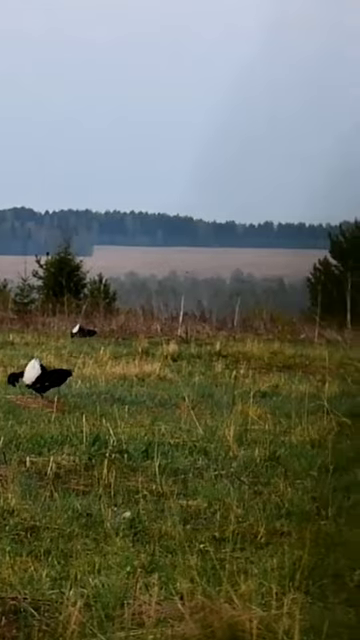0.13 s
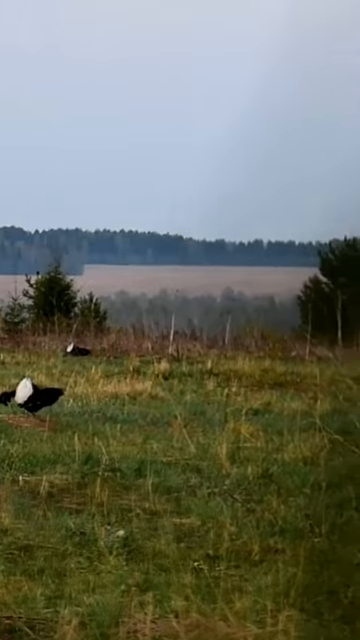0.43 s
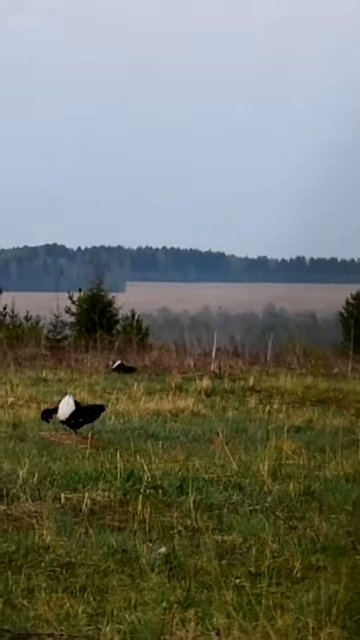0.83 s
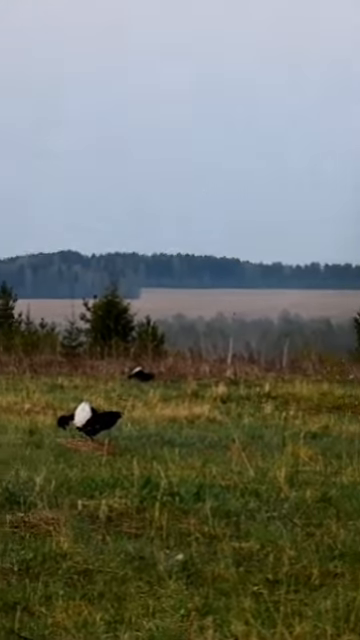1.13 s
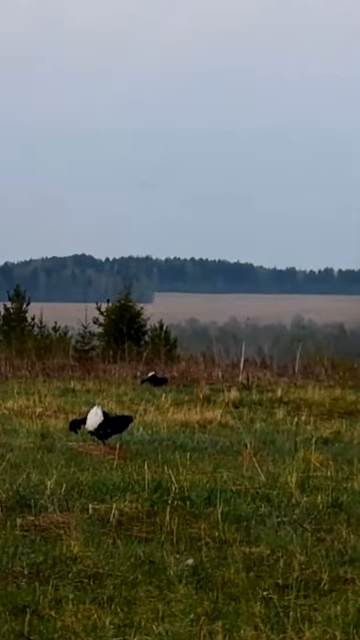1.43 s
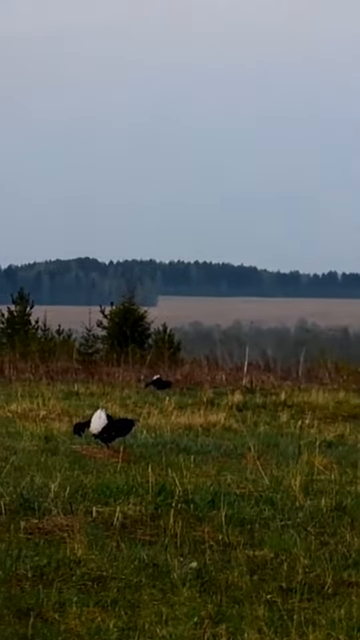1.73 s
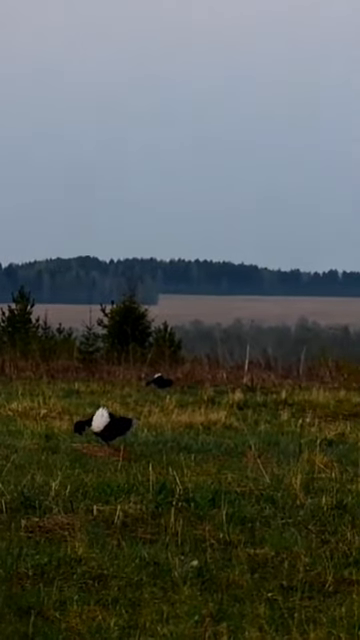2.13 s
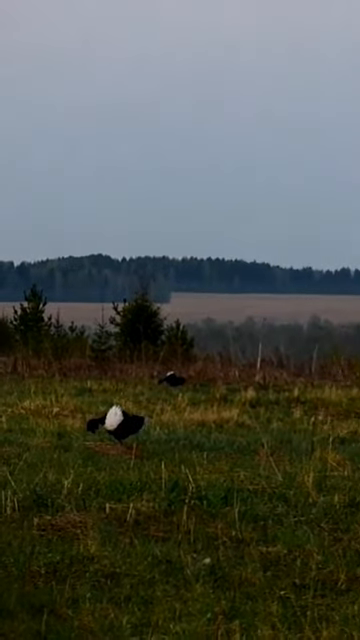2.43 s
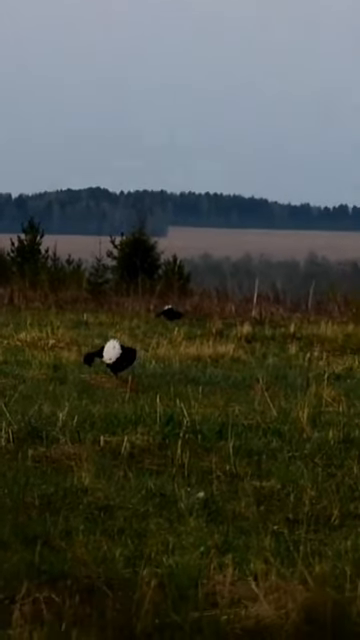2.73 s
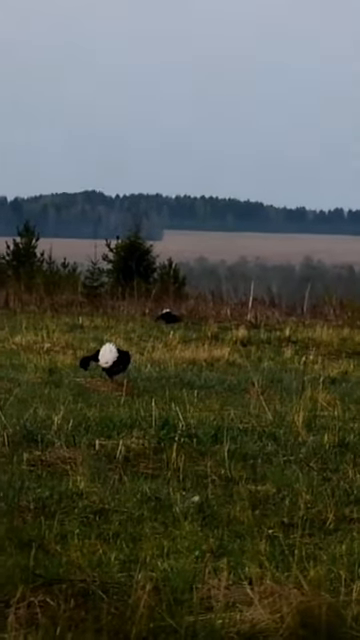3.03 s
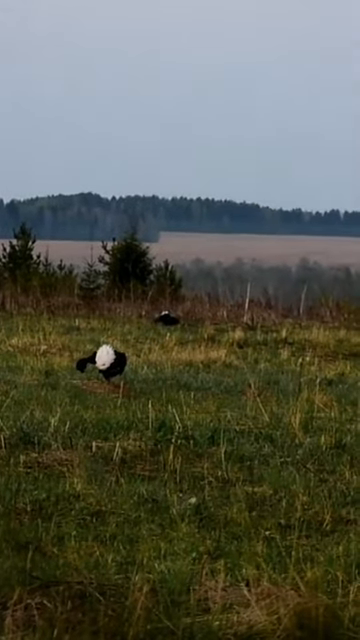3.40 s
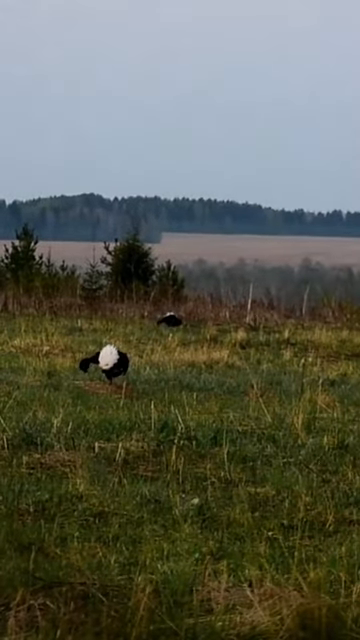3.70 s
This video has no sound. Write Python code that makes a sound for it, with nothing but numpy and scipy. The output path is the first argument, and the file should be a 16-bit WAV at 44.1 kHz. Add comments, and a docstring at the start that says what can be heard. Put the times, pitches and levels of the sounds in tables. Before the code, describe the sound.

Bubbling grouse coos and a long hoarse hiss in a field, with light rustling and chirps.

```python
"""An open field where black grouse display, under a faint hush of moving air.
Close by, fabric rustles by stick-slip friction and ticks as its folds snap over. Resonating air sacs
give a bubbling run of soft, falling coos, while small songbirds whistle arched, frequency-modulated
notes overhead; ground and trees scatter both into echoes. Last comes one cock's long, hoarse hiss:
turbulent air filtered by the resonance of his throat."""
import sys
import numpy as np
from scipy import signal
from scipy.fft import rfft, irfft
from scipy.io import wavfile
from scipy.ndimage import uniform_filter1d

SR = 44100
rng = np.random.default_rng(int(sys.argv[2]) if len(sys.argv) > 2 else 0)


def log_audio(samples):
    """Write samples as a 16-bit WAV file to the path given in sys.argv[1]."""
    # one column per channel
    frames = np.atleast_2d(samples).T
    # limit to full scale, then quantise
    limited = np.clip(frames, -1, 1)
    pcm = np.round(limited * 32767).astype(np.int16)
    wavfile.write(sys.argv[1], SR, pcm)


N = 170226
T = np.arange(N) / SR


def from_db(db):
    """Amplitude ratio of a level in dB."""
    return 10 ** (np.asarray(db) / 20)


def unit_rms(x):
    """Normalisation to an rms of 1."""
    return x / np.sqrt(np.mean(x ** 2) + 1e-20)


def in_time(rows):
    """Linear interpolation of each column over the times in the first."""
    s, *columns = np.transpose(rows)
    return [np.interp(T, s, c) for c in columns]


def add(out, start_s, sound):
    """Superposition of a sound from its starting time."""
    i = int(np.clip(start_s * SR, 0, N))
    out[i:i + len(sound)] += sound[:N - i]


def coloured(x, spectrum):
    """Filtering by a spectral envelope; rms 1."""
    hz, db = np.transpose(spectrum)
    bins = np.maximum(np.fft.rfftfreq(N, 1 / SR), 1)
    gain = from_db(np.interp(np.log(bins), np.log(hz), db))
    return unit_rms(irfft(rfft(x) * gain, N))


def drift(corner_hz):
    """Random fluctuation: low-passed Gaussian noise of rms 1."""
    r = np.exp(-2 * np.pi * corner_hz / SR)
    return unit_rms(signal.lfilter([1], [1, -2 * r, r * r], rng.standard_normal(N + SR))[SR:])


# spectrum of open air: f/Hz, relative level/dB
AIR_SPECTRUM = [(25, -14), (70, -4), (350, 1.5), (800, -5.5), (2000, -6), (3700, -4), (5500, -13),
                (16000, -25.5)]
def open_air(level_db=-58.5):
    """Stationary broadband noise: the hush of open air."""
    return from_db(level_db) * coloured(rng.standard_normal(N), AIR_SPECTRUM)


# spectrum of the fabric: f/Hz, relative level/dB
FABRIC_SPECTRUM = [(60, -16.5), (2300, -9), (3300, 2.5), (5200, -6.5), (6200, -10), (7700, -16),
                   (10200, -14), (11500, -21), (16000, -32)]
# envelope of the rubbing: t/s, level/dB
RUB_ENVELOPE = [(.13, -62.5), (.22, -53), (.4, -58), (.6, -56), (.88, -55), (1.06, -57), (1.3, -54),
                (1.55, -51), (1.8, -47.5), (1.98, -63), (2.92, -56.5), (3.05, -61), (3.74, -59),
                (3.82, -53.5)]
def fabric_rustle(slips_per_s=1500, spread_db=3, decay_s=0.0007, flutter_db=1.67):
    """Stick-slip friction: fibres catch and let go, each slip a tiny decaying burst of noise."""
    db, = in_time(RUB_ENVELOPE)
    sizes = from_db(spread_db * np.minimum(rng.exponential(1, N), 5))
    slips = sizes * (rng.random(N) < slips_per_s / SR)
    power = signal.lfilter([1], [1, -np.exp(-1 / (decay_s * SR))], slips ** 2 + 1e-18)
    crackle = coloured(np.sqrt(power) * rng.standard_normal(N), FABRIC_SPECTRUM)
    return crackle * from_db(db + flutter_db * drift(38))


# snapping folds: t/s, relative level/dB, resonance f/Hz
FOLD_SNAPS = [(0.1622, -45, 2360), (.185, -41, 3180), (.2043, -38.5, 3330), (0.255, -52.5, 10200),
              (.302, -52.5, 12800), (0.8513, -40, 6140), (0.9, -48, 9500), (0.976, -36.5, 3240),
              (1.141, -39.5, 3370), (1.3803, -41, 3320), (1.488, -45.5, 5600), (1.53, -42, 3240),
              (1.636, -44.5, 4600), (1.733, -40, 7200), (1.739, -37, 9700), (1.93, -34, 4380),
              (2.074, -46.5, 4000), (2.1485, -43, 3600), (2.273, -47, 3900), (2.4106, -51, 9300),
              (2.6207, -42.5, 10600), (2.696, -38, 3500), (2.827, -46.5, 3280), (2.8578, -41.5, 2800)]
def fabric_ticks(tick_s=0.0056, bandwidth_hz=1320, crack_db=-4):
    """Buckling: a fold snaps over in a few milliseconds of crackle with a resonance of its own."""
    out = np.zeros(N)
    crack = from_db(crack_db) * coloured(rng.standard_normal(N), FABRIC_SPECTRUM)
    t = T[:SR // 20]
    envelope = t * np.exp(-3.5 * t / tick_s)
    r = np.exp(-np.pi * bandwidth_hz / SR)
    for s, db, hz in FOLD_SNAPS:
        resonator = [1, 0, -1, 1, -2 * r * np.cos(2 * np.pi * hz / SR), r * r]
        ring = unit_rms(signal.sosfilt([resonator] * 2, rng.standard_normal(len(t))))
        snap = (ring + crack[int(s * SR):][:len(t)]) * envelope
        snap_rms = np.sqrt(np.sum(snap ** 2) / (tick_s * SR))
        add(out, s, from_db(db) * snap / snap_rms)
    return out


def coo(hz, half_s, sweep_hz, arch_hz=56, overtone_db=-24):
    """Air-sac resonance: a near-pure note swells and fades, arching from hz + sweep to hz - sweep."""
    u = np.arange(-half_s, half_s, 1 / SR) / half_s
    pitch = hz - sweep_hz * u - arch_hz * u ** 2
    phase = 2 * np.pi * (np.cumsum(pitch) / SR + rng.random())
    swell = np.cos(np.pi / 2 * u).clip(0) ** 2.64
    return swell * (np.sin(phase) + from_db(overtone_db) * np.sin(2 * phase))


def echoes(x, span_s=0.22, count=40):
    """Scattering from ground and trees: delayed, dying copies, together as strong as the source."""
    out = np.zeros(N)
    for lag, size in zip(rng.random(count), rng.standard_normal(count)):
        add(out, lag * span_s, x * size * from_db(-20 * lag))
    return unit_rms(out) * np.std(x)


# even runs of coos: first note, last note, count; each note: centre t/s, level/dB, f/Hz
COO_RUNS = [((.208, -48.5, 396), (.724, -46, 408), 8), ((1.02, -50, 392), (1.822, -43, 430), 12)]
# single coos: centre t/s, level/dB, f/Hz, half duration/s
SINGLE_COOS = [(1.1, -52.5, 509.4, .07), (1.258, -49, 558, 0.031), (1.901, -45, 435.4, .045),
               (1.983, -40.5, 437, .025), (2.048, -44, 464, .025), (2.111, -48.5, 433, 0.016),
               (2.388, -41.5, 501.6, 0.033), (2.485, -41, 486, 0.011), (2.566, -43, 457, 0.015),
               (2.614, -40.5, 467, 0.016), (2.654, -41.5, 410, 0.023), (2.692, -40, 432, 0.013),
               (2.73, -40.5, 419, 0.017), (2.768, -44, 391, 0.018), (2.868, -39.5, 439, .032),
               (3.0, -43, 494.7, 0.056), (3.086, -42.5, 440, 0.0133), (3.157, -40, 534, 0.014),
               (3.23, -43.5, 542.6, 0.04), (3.269, -42.5, 470, .026), (3.307, -42.5, 431, 0.015),
               (3.343, -42.5, 428, 0.016), (3.412, -38.5, 446, 0.022), (3.815, -49, 518, 0.048)]
def grouse_bubbling(half_s=0.033, steep_hz=91.2, shallow_hz=47.3, far_hz=479.7, far_count=110):
    """Superposition of coos: steeply falling runs, flatter single notes and a far, scattered murmur."""
    near, far = np.zeros(N), np.zeros(N)
    for first, last, count in COO_RUNS:
        for s, db, hz in np.linspace(first, last, count):
            add(near, s - half_s, from_db(db) * coo(hz, half_s, steep_hz))
    for s, db, hz, own_half_s in SINGLE_COOS:
        add(near, s - own_half_s, from_db(db) * coo(hz, own_half_s, shallow_hz))
    for s, detune in zip(rng.uniform(0, T[-1], far_count), rng.standard_normal(far_count)):
        add(far, s, from_db(-59.5) * coo(far_hz * np.exp(0.0943 * detune), half_s, shallow_hz))
    return near + from_db(-11) * echoes(near) + echoes(far)


def whistle(length_s, pitches, rasp=0.48, rasp_hz=1286, waver_depth=0.0142):
    """Modulation: a tone arches through three pitches; rasp shakes its amplitude and phase at random."""
    u = np.linspace(0, 1, int(length_s * SR))
    hz = np.polyval(np.polyfit([0, .5, 1], pitches, 2), u)
    waver = np.interp(u, np.linspace(0, 1, 20), rng.standard_normal(20))
    knots = rng.standard_normal(400) + 1j * rng.standard_normal(400)
    shake = np.interp(u * length_s * rasp_hz, np.arange(len(knots)), knots)
    tone = np.exp(2j * np.pi * np.cumsum(hz * (1 + waver_depth * waver)) / SR)
    swell = signal.windows.tukey(len(u), .35) * (hz.mean() / hz) ** 3.2  # weaker as it climbs
    return swell * np.real(tone * (np.sqrt(1 - rasp) + np.sqrt(rasp) * shake))


# far slurs: start t/s, duration/s
FAR_SLURS = [(.26, 0.14), (0.601, 0.092), (.92, .13), (1.271, 0.12)]
# near whistles: start t/s, duration/s, first f/Hz, middle f/Hz, last f/Hz, relative level/dB
NEAR_WHISTLES = [(.398, .056, 4120, 3900, 4280, -43), (0.459, 0.041, 4380, 3260, 2710, -46),
                 (0.563, 0.042, 6700, 6770, 6580, -46), (0.599, .052, 7250, 6630, 6630, -45),
                 (2.963, 0.066, 3590, 3330, 2750, -50), (3.036, 0.045, 3140, 2860, 2590, -44),
                 (3.097, 0.052, 2720, 2566, 2600, -45), (3.167, 0.077, 2440, 2452, 2427, -45.5),
                 (3.293, .024, 2930, 2896, 3040, -47.5), (3.387, 0.077, 5000, 6800, 3680, -52.5),
                 (3.488, 0.069, 4800, 6380, 4030, -50.5), (3.588, 0.068, 5100, 6550, 3520, -54),
                 (3.724, 0.03, 7350, 4920, 3850, -52)]
# one turn of a warble: delay t/s, duration/s, first f/Hz, middle f/Hz, last f/Hz, relative level/dB
WARBLE_TURN = [(0, 0.062, 6246, 4670, 4150, -58.5), (.035, .085, 4100, 3600, 3236, -58.5)]
def songbirds(full_rasp_hz=13400, turn_s=0.119, buzz_note_s=0.0153):
    """Direct and scattered sound: near whistles and a buzz; far slurs and a warble with more echo."""
    near, far = np.zeros(N), np.zeros(N)
    for s, length_s in FAR_SLURS:
        add(far, s, from_db(-56) * whistle(length_s, (5220, 5800, 4110)))
    for s, length_s, first, middle, last, db in NEAR_WHISTLES:
        rasp = (middle / full_rasp_hz) ** 2  # higher notes are raspier
        add(near, s, from_db(db) * whistle(length_s, (first, middle, last), rasp))
    for turn_start in 2.017 + turn_s * np.arange(7):
        for delay, length_s, *pitches, db in WARBLE_TURN:
            add(far, turn_start + delay, from_db(db) * whistle(length_s, pitches))
    for s in 3.663 + buzz_note_s * np.arange(5):
        add(near, s, from_db(-50.5) * whistle(buzz_note_s, (7140, 6730, 6150)))
    return near + from_db(-10.5) * echoes(near) + far + 0.5 * echoes(far)


def resonant_air(hz, width_hz):
    """Band-limited noise: turbulence in a resonance whose centre may move; rms 1."""
    phase = 2 * np.pi * np.cumsum(hz * np.ones(N)) / SR
    return unit_rms(drift(width_hz / 2) * np.cos(phase) + drift(width_hz / 2) * np.sin(phase))


# course of the hiss: t/s, throat resonance f/Hz, level/dB
HISS_CONTOUR = [(2.96, 1494, -55.5), (2.994, 1488, -50), (3.005, 1485, -38.5), (3.025, 1452, -37),
                (3.08, 1396, -44), (3.19, 1167, -54.5), (3.32, 1288, -50.5), (3.48, 1397, -45.5),
                (3.7, 1425, -42.5), (3.77, 1430, -45.5), (3.83, 1628, -41.5), (3.86, 1626, -46.5)]
def grouse_hiss(harsh_from_s=3.775, harsh_db=7, rattle_hz=117.9, rattle_depth=0.27):
    """Source and filter: rattling air is forced through a throat resonance that sinks and climbs."""
    hz, db = in_time(HISS_CONTOUR)
    core = resonant_air(hz, width_hz=109)
    skirt = from_db(-6) * resonant_air(hz, width_hz=513)
    breath = from_db(-15) * resonant_air(4570, width_hz=2200)
    harshness = from_db(harsh_db * uniform_filter1d(1.0 * (T > harsh_from_s), SR // 20))
    high_pass = signal.butter(5, 1080, "high", fs=SR, output="sos")
    voice = signal.sosfilt(high_pass, core + (skirt + breath) * harshness)
    jittered_hz = rattle_hz * (1 + 0.0802 * drift(19.8))
    rattle = 1 + rattle_depth * np.sin(2 * np.pi * np.cumsum(jittered_hz) / SR)
    return unit_rms(voice * rattle) * from_db(db) * (T > HISS_CONTOUR[0][0])


def scene():
    """Superposition of air, fabric and birds at one point."""
    air = open_air()
    fabric = fabric_rustle() + from_db(-1) * fabric_ticks()
    birds = grouse_bubbling() + songbirds() + grouse_hiss()
    return (air + fabric + birds)[None]


def record(dry, start_s=0.128, cutoff_hz=15800):
    """Gating and low-pass filtering: a moment of silence, then the sound without its highest treble."""
    low_pass = signal.ellip(10, .2, 70, cutoff_hz, fs=SR, output="sos")
    return signal.sosfilt(low_pass, dry * (T > start_s))


dry = scene()
out = record(dry)
log_audio(out)
```